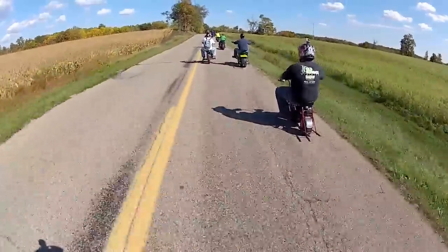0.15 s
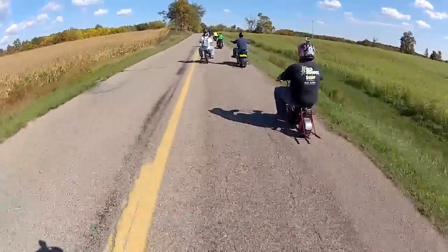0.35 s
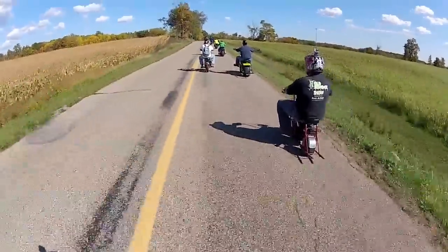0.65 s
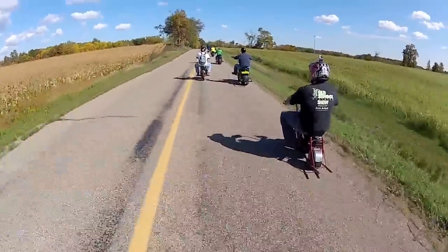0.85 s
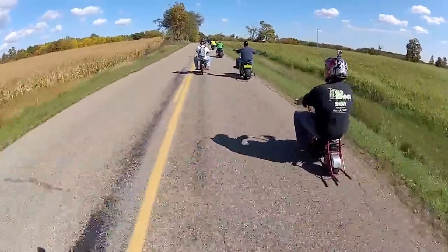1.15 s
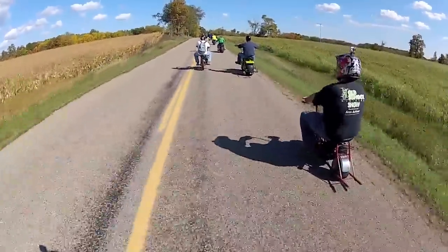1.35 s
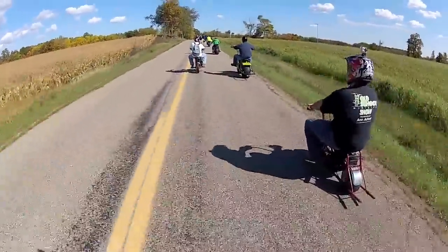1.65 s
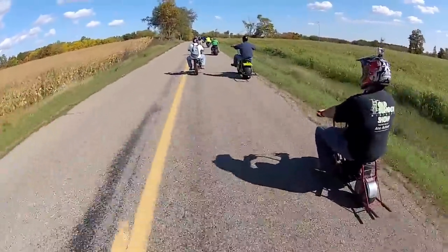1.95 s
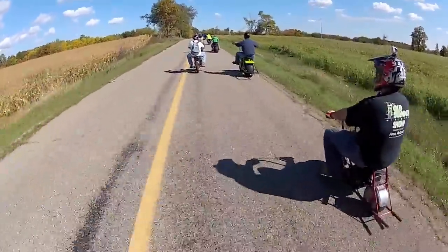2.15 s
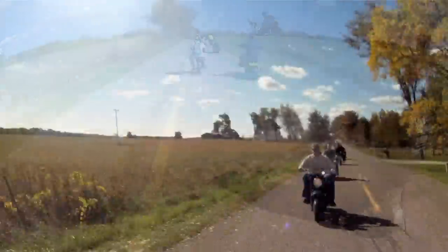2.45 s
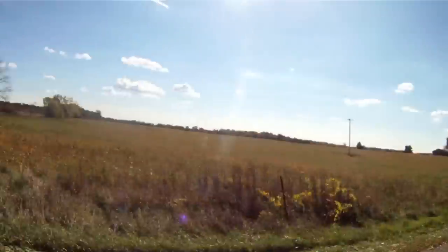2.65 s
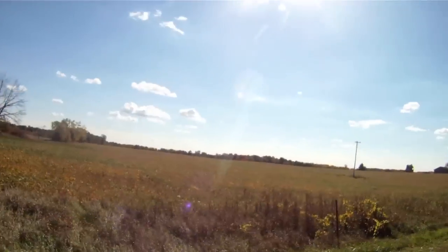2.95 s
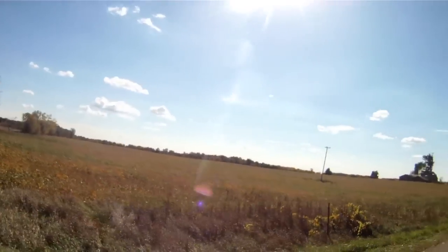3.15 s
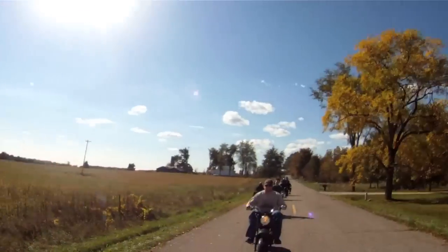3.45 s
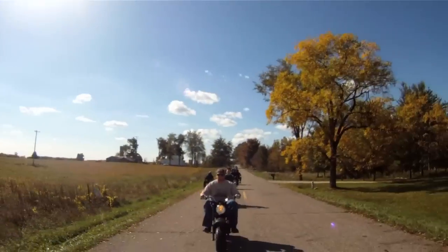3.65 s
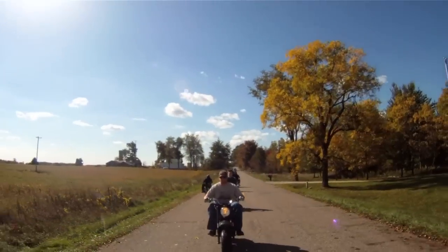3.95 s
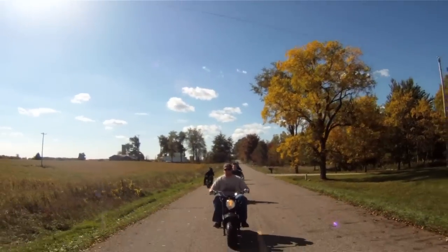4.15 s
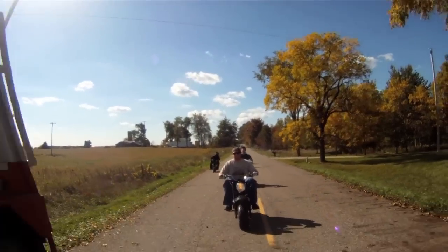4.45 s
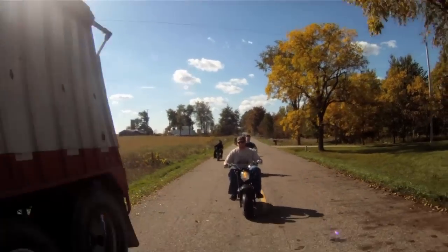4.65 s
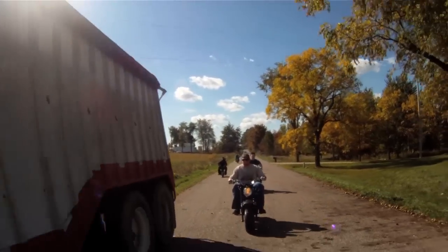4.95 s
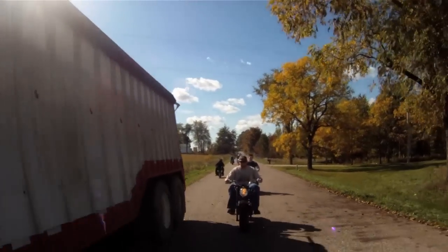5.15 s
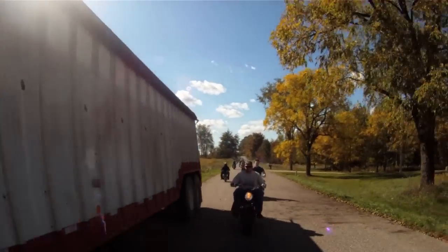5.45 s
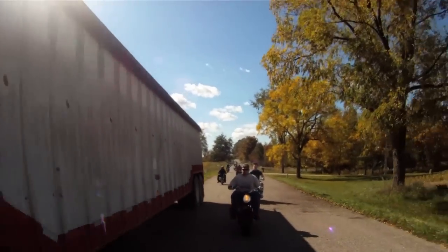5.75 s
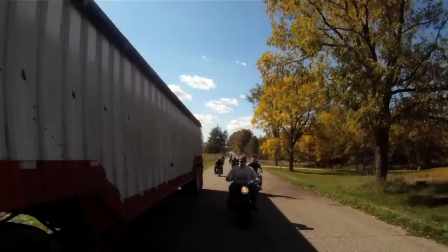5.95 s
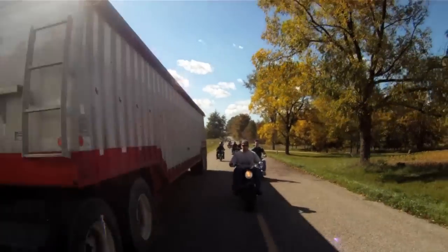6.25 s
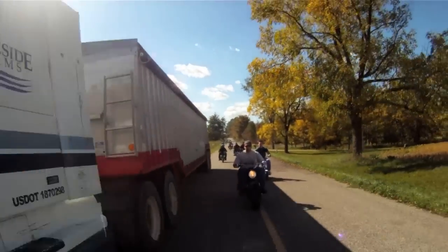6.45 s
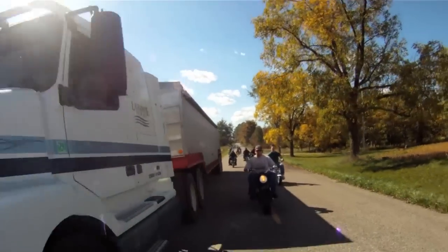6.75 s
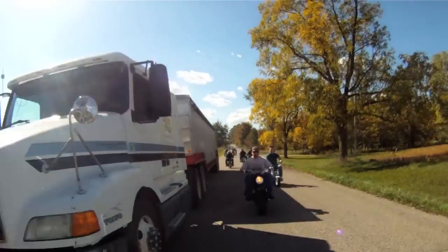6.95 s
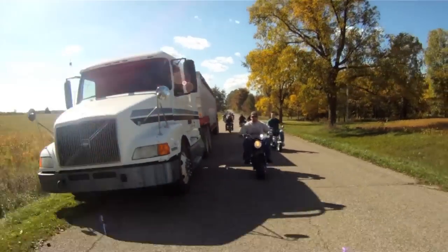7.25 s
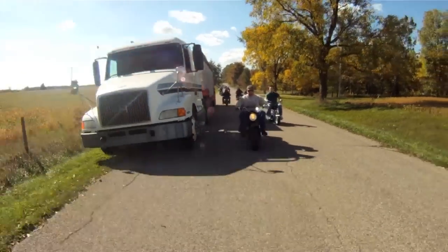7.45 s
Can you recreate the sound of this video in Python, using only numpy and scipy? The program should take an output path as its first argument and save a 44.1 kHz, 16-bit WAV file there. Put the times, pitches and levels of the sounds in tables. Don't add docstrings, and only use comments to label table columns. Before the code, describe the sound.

Riding outdoors on a country road with a microphone in a closed case, two small single-cylinder engines buzz loudly, drifting in and out of step, with sharp cracks and brief overloaded thumps. After about two seconds they crossfade to a quieter group: slower puttering engines, ringing valve ticks, a wavering chain hum and low wind. A third engine joins, thickening the middle beside a parked lorry, then drops away.

```python
import sys
import numpy as np
from scipy import signal
from scipy.io import wavfile
from scipy.ndimage import uniform_filter1d

SR = 44100
rng = np.random.default_rng(int(sys.argv[2]) if len(sys.argv) > 2 else 0)


def volts_from_db(level):
    exponent = np.asarray(level, float) / 20
    return 10 ** exponent


def waveform_to_disk(signal):
    frames = np.transpose(np.atleast_2d(signal))
    scaled = np.clip(frames, -1, 1) * 32767
    samples = np.round(scaled).astype(np.int16)
    wavfile.write(sys.argv[1], SR, samples)


N = 334719

DISSOLVE_S = (2.21, 2.59)
OPEN_ROAD_S = (6.95, 7.15)


def unit(x):
    return x / np.sqrt(np.mean(x ** 2))


def ramp(t0, t1):
    return np.clip((np.arange(N) / SR - t0) / (t1 - t0), 0, 1)


def curve(table):
    s, *columns = np.transpose(table)
    return [np.interp(np.arange(N) / SR, s, column) for column in columns]


def walk(rate_hz):
    k = int(SR / rate_hz)
    held = np.repeat(rng.standard_normal(N // k + 1), k)
    return 0.58 * uniform_filter1d(uniform_filter1d(held, k), k)[:N]


def ring(x, hz, width_hz):
    return signal.lfilter(*signal.iirpeak(hz, hz / width_hz, fs=SR), x)


def ring_twice(x, hz, width_hz):
    return ring(ring(x, hz, width_hz), hz, width_hz)


def body(x, modes):
    out, struck = np.zeros(N), np.flatnonzero(x)
    live = slice(struck[0], struck[-1] + 8192)
    for k, (hz, width_hz, db) in enumerate(modes):
        out[live] += (-1) ** k * volts_from_db(db) * ring_twice(x[live], hz, width_hz)
    return out


def firings(crank):
    s, count = np.transpose(crank)
    when = np.interp(np.arange(count[0], count[-1]), count, s)
    when[1:] = when[0] + np.cumsum(uniform_filter1d(np.diff(when), size=5))
    return when


def engine(crank, throttle, mix, pipe, early_s, jitter_s, echo_s, echo_gain, opening_s,
           scatter_db, puff_early_s, puff_s, shell_db_s=0):
    when = firings(crank)
    chance = rng.standard_normal((len(when), 3))
    at = np.clip(((when - early_s + jitter_s * chance[:, 0]) * SR).astype(int), 0, N - 1)
    span = slice(at[0], at[-1])
    pulses, valve = np.zeros(N), np.zeros(N)
    pulses[at] = -volts_from_db(scatter_db * chance[:, 1])
    pulses = np.convolve(pulses, np.hanning(int(opening_s * SR)))[:N]

    valve[np.clip(at - int(puff_early_s * SR), 0, N - 1)] = volts_from_db(2.5 * chance[:, 2])
    t = np.arange(2048) / SR / puff_s
    gas = signal.fftconvolve(valve, t * np.exp(-t))[:N] * rng.standard_normal(N)

    exhaust = body(pulses + echo_gain * np.roll(pulses, int(echo_s * SR)), pipe[:-1])
    shell = body(pulses, pipe[-1:])
    load, = curve(throttle)
    exhaust_db, gas_db, shell_db = (shut + (wide - shut) * load for shut, wide in mix)
    shell_db = shell_db + shell_db_s * np.arange(N) / SR
    tone = volts_from_db(exhaust_db) * exhaust / exhaust[span].std() + volts_from_db(shell_db) * shell / shell[span].std()
    return np.array([tone, volts_from_db(gas_db) * gas / gas[span].std()])


def cracks(crank, bouts, early_s, top_db, scatter_db, detune, width_hz, shell_db):
    when = firings(crank)
    chance = np.clip(rng.standard_normal((len(when), 2)), -2, 2)
    out, t = np.zeros(N + 1024), np.arange(1024) / SR
    fade = np.exp(-t / 0.0027) * (1 - np.exp(-t / 0.0007))
    for first, length, db, hz in bouts:
        varied = length > 0
        for s, (a, b) in zip(when, chance):
            if not first - .014 < s < first + length + .014:
                continue
            pitch_hz = hz * (1 + varied * detune * b)
            peak_db = db + varied * scatter_db * a
            puff = rng.standard_normal((2, 1024)) * fade
            low = ring(puff[0], pitch_hz, width_hz) + volts_from_db(shell_db) * ring(puff[0], pitch_hz, 60)
            top = ring_twice(puff[1], 4980, 1100)
            burst = low / np.abs(low).max() + volts_from_db(top_db) * top / np.abs(top).max()
            i = int((s - early_s) * SR)
            out[i:i + 1024] += volts_from_db(peak_db - 3) * burst
    return out[:N]


# (time [s], firings so far [count])
OWN_CRANK = [(-0.0283, -1), (0.2738, 8), (0.806, 24), (1.3469, 40), (1.625, 48), (1.9088, 56), (2.1993, 64),
             (2.3474, 68), (2.6633, 76)]
# (time [s], load [0-1])
OWN_LOAD = [
    (0, 0.57),
    (.5, 0.92),
    (1, .5),
    (1.6, 0.22),
    (2.2, 0),
]
# (throttle shut [dB], wide open [dB])
OWN_MIX = [(-12, -7), (-89, -32.5), (-20, -19.5)]
# (pitch [Hz], width [Hz], level [dB])
OWN_PIPE = [(187.4, 181, -2.5), (288, 238, -12.5), (529, 174, -20), (767, 127, -20.5), (1050, 200, -48),
            (257.6, 33.4, 0)]
# (first [s], length [s], peak [dB], pitch [Hz])
OWN_CRACKS = [
    (.173, 0, -15, 1500),
    (.74, 0, -13, 1400),
    (.806, 0, -15, 1500),
    (1.625, 0, -16, 1800),
]


def own_bike():
    sound = engine(OWN_CRANK, OWN_LOAD, OWN_MIX, OWN_PIPE, early_s=.0106, jitter_s=.00012, echo_s=.0056,
                   echo_gain=1.25, opening_s=.0008, scatter_db=2.77, puff_early_s=.0015, puff_s=.00067,
                   shell_db_s=3)
    return sound, cracks(OWN_CRANK, OWN_CRACKS, early_s=.0105, top_db=-25, scatter_db=2, detune=.1,
                         width_hz=1200, shell_db=-8)


# (time [s], firings so far [count])
NEXT_CRANK = [(-0.011, 0), (0.2107, 7), (0.4591, 15), (0.7114, 23), (0.971, 31), (1.2895, 41), (1.8848, 59),
              (2.222, 69), (2.6055, 80)]
# (time [s], load [0-1])
NEXT_LOAD = [
    (0, 0.43),
    (.4, 0),
    (1, 0.28),
    (1.2, 0.78),
    (1.5, .25),
    (1.9, 0.49),
    (2.3, 0.44),
]
# (throttle shut [dB], wide open [dB])
NEXT_MIX = [(-21.5, -10.5), (-48, -20), (-17.5, -27)]
# (pitch [Hz], width [Hz], level [dB])
NEXT_PIPE = [(108, 89, 2), (204, 130, 4), (464, 260, -11), (658, 82, -2.5), (764, 155, -4.5),
             (1065, 140, -33.5), (331, 146, 0)]
# (first [s], length [s], peak [dB], pitch [Hz])
NEXT_CRACKS = [(.21, 0, -11, 2930), (.303, 0, -4, 2500), (.365, 0, -5, 2300), (.459, 0, -10, 2690),
               (.711, 0, -18, 2760), (.97, 0, -6, 2600), (1.034, .066, -16, 3400), (1.13, .1, -8, 2400),
               (1.258, .13, -12.5, 3000), (1.488, .1, -13.5, 2250), (1.651, 0, -11.5, 3100),
               (1.716, 0, -20, 3100), (1.885, .034, -9, 2200), (2.155, 0, -4.5, 2400),
               (2.224, 0, -9.5, 2050), (2.397, 0, -15, 3400)]


def next_bike():
    sound = engine(NEXT_CRANK, NEXT_LOAD, NEXT_MIX, NEXT_PIPE, early_s=.0014, jitter_s=.0002, echo_s=.008,
                   echo_gain=.4, opening_s=.0008, scatter_db=3.5, puff_early_s=.00031, puff_s=.0021,
                   shell_db_s=-6.5)
    return sound, cracks(NEXT_CRANK, NEXT_CRACKS, early_s=.0003, top_db=-11, scatter_db=1.5, detune=.12,
                         width_hz=900, shell_db=0)


# (time [s], firings so far [count])
LEAD_CRANK = [(2.2754, 0), (2.7467, 10), (3.1248, 18), (3.5347, 27), (3.9394, 36), (4.2857, 44),
              (4.6184, 52), (4.9512, 60), (5.2298, 67), (5.5618, 75), (5.8972, 83), (6.2188, 91),
              (6.514, 98), (6.8472, 106), (7.0913, 112), (7.319, 118), (7.6123, 126)]
# (time [s], load [0-1])
LEAD_LOAD = [(2.5, 0.43), (3.3, 0.95), (3.7, 0.66), (4, 1), (4.3, 0.78), (4.55, 1), (4.75, 0.29),
             (5.05, 0.99), (5.3, 0.14), (5.7, .3), (6.05, 1), (6.3, 0.23), (6.5, 0.8), (6.75, 0), (7, 0.79),
             (7.45, 0.63), (7.6, 0)]
# (throttle shut [dB], wide open [dB])
LEAD_MIX = [(-26.5, -20), (-41, -32.5), (-24.5, -38.5)]
# (pitch [Hz], width [Hz], level [dB])
LEAD_PIPE = [(465, 280, 0), (150, 130, -9), (400, 38, 0)]
# (first [s], length [s], peak [dB], pitch [Hz])
LEAD_TICKS = [(3.307, 0, -16, 2880), (3.714, 0, -14.5, 2390), (3.895, .045, -13.5, 2500),
              (4.026, .044, -22, 3200), (4.369, .085, -21, 3100), (4.493, .085, -11.5, 2250),
              (4.618, 0, -14.5, 2980), (6.018, .08, -13, 2350), (6.514, 0, -14, 2400),
              (7.05, .38, -12, 2330), (7.503, .04, -19, 3100)]


def lead_bike():
    sound = engine(LEAD_CRANK, LEAD_LOAD, LEAD_MIX, LEAD_PIPE, early_s=.003, jitter_s=.00008, echo_s=.0023,
                   echo_gain=1.15, opening_s=.0024, scatter_db=1.3, puff_early_s=.004, puff_s=.005)
    open_db = 3 * ramp(*OPEN_ROAD_S)
    return sound * volts_from_db([open_db, -open_db]), cracks(
        LEAD_CRANK, LEAD_TICKS, early_s=.0025, top_db=-30, scatter_db=1.2, detune=.03, width_hz=380, shell_db=9)


# (time [s], firings so far [count])
SLOW_CRANK = [(2.227, 0), (2.7062, 10), (3.0856, 18), (3.595, 28), (4.1473, 39), (4.7623, 51), (5.1151, 58),
              (5.4353, 64), (5.6408, 68), (5.9551, 74), (6.2505, 80), (6.4989, 85), (6.9161, 93),
              (7.2812, 100), (7.6379, 107)]
# (time [s], load [0-1])
SLOW_LOAD = [(2.5, 0.4), (3.4, 0.62), (4.6, 0.87), (5.5, 0.97), (6, 0.29), (6.5, 0.81), (7, 0.82),
             (7.3, 0.22), (7.6, 0.56)]
# (throttle shut [dB], wide open [dB])
SLOW_MIX = [(-23.5, -23), (-67, -37), (-37, -25)]
# (pitch [Hz], width [Hz], level [dB])
SLOW_PIPE = [(120, 102, -5.5), (188, 70, 5.5), (409, 150, -11.5), (544, 93, -11), (268, 45, 0)]
# (first [s], length [s], peak [dB], pitch [Hz])
SLOW_TICKS = [(4.964, 0, -19, 2340), (5.275, 0, -21, 2300), (5.435, 0, -14, 2380), (5.538, 0, -14, 2300),
              (6.35, .05, -21, 2460), (6.499, 0, -22, 2300), (6.707, .053, -19, 2300),
              (6.812, .052, -17, 2370), (6.916, .052, -12.5, 2340), (7.02, .105, -15.5, 2300),
              (7.177, 0, -21, 2300), (7.229, 0, -14, 2330)]


def slow_bike():
    sound = engine(SLOW_CRANK, SLOW_LOAD, SLOW_MIX, SLOW_PIPE, early_s=.009, jitter_s=.0005, echo_s=.0075,
                   echo_gain=.9, opening_s=.002, scatter_db=2.6, puff_early_s=-.006, puff_s=.002)
    return sound * volts_from_db(-6.5 * ramp(*OPEN_ROAD_S)), cracks(
        SLOW_CRANK, SLOW_TICKS, early_s=.0025, top_db=1, scatter_db=1.5, detune=.02, width_hz=600, shell_db=4)


# (time [s], firings so far [count])
FAR_CRANK = [(4.69, 0), (5.674, 25), (5.867, 30), (6.184, 38), (6.48, 46), (7.03, 60)]
# (time [s], load [0-1])
FAR_LOAD = [
    (4.85, 0.77),
    (5.3, 0),
    (5.75, 0.8),
    (6.2, 0.32),
    (6.6, 0.83),
    (6.9, 0.21),
]
# (throttle shut [dB], wide open [dB])
FAR_MIX = [(-45.5, -13), (-40.5, -39), (-39.5, -22)]
# (pitch [Hz], width [Hz], level [dB])
FAR_PIPE = [(220, 290, -1), (328, 57, 9.5), (490, 220, -3.5), (522, 114, 0)]


def far_bike(start_s=4.7, end_s=7.02, fade_s=.051):
    sound = engine(FAR_CRANK, FAR_LOAD, FAR_MIX, FAR_PIPE, early_s=.002, jitter_s=.0004, echo_s=.004,
                   echo_gain=.5, opening_s=.0016, scatter_db=3, puff_early_s=.001, puff_s=.002)
    return sound * (ramp(start_s, start_s + fade_s) - ramp(end_s - fade_s, end_s))


# (pitch [Hz], width [Hz], level [dB])
SILENCER = [(1117, 91, 9.5), (1385, 830, -1.5), (2243, 73, 4), (2360, 40, 11.5), (2940, 1410, 3),
            (3953, 440, -7.5), (4730, 930, -3.5)]


def silencer_hiss(gas):
    return unit(body(gas, SILENCER)) * gas.std()


# (time [s], jolt peak [dB], gain duck [dB])
DUCKS = [
    (.309, 4, -9),
    (.371, 0, -5),
    (.975, 5, -10),
]


def jolts(hz=150, width_hz=300, early_s=.005):
    kick = np.zeros(N)
    for s, peak_db, _ in DUCKS:
        kick[int((s - early_s) * SR)] = volts_from_db(peak_db)
    thump = ring_twice(kick, hz, width_hz)
    return thump * kick.max() / np.abs(thump).max()


# (time [s], pitch [Hz], level [dB])
DRIVE = [(2.45, 391, -24), (2.7, 396, -21), (3.03, 386, -22), (3.2, 400, -23), (3.4, 397, -23),
         (3.6, 398, -19), (3.85, 404, -22), (4.1, 416, -24.5), (4.45, 425, -29)]


def drive():
    hz, level_db = curve(DRIVE)
    phase = 2 * np.pi * np.cumsum(hz) / SR + .3 * walk(20)
    return volts_from_db(level_db + 2.2 * walk(25)) * np.sqrt(2) * np.sin(phase) * (1 - ramp(4.25, 4.45))


def roadside(x, wet_db=-7, decay_s=.014):
    t = np.arange(4096) / SR
    tail = rng.standard_normal(4096) * t / decay_s * np.exp(-t / decay_s)
    return volts_from_db(wet_db) * signal.fftconvolve(x, tail / np.linalg.norm(tail))[:N]


def gust(at_s=6.345, peak_db=-14, hz=55.4):
    t = np.arange(N) / SR - at_s
    return volts_from_db(peak_db) * np.exp(-(t / 0.011) ** 2) * np.sin(2 * np.pi * hz * t)


# (frequency [Hz], level [dB per Hz])
WIND = [(25, -12), (149, 4), (224, -1), (470, -2), (885, -36.5), (1140, -27), (3040, -23.5), (4910, -37)]


def wind():
    out, swell = 0, walk(4.5)
    hz, db = np.transpose(WIND)
    for f in 25 * 2 ** (np.arange(24) / 3):
        noise = ring_twice(rng.standard_normal(N), f, f / 2.43)
        out = out + noise * volts_from_db(np.interp(np.log(f), np.log(hz), db) + 0.5 * swell + 5.4 * walk(18))
    return unit(out) * volts_from_db(-19 - .5 * ramp(*DISSOLVE_S) - 1.5 * ramp(*OPEN_ROAD_S))


def scene():
    after = ramp(*DISSOLVE_S)
    own, own_cracks = own_bike()
    beside, next_cracks = next_bike()
    lead, lead_ticks = lead_bike()
    slow, slow_ticks = slow_bike()
    behind = slow * after + far_bike()
    tone, gas = (own + beside) * (1 - after) + lead * after + behind
    tone = tone + roadside(behind[0])
    hits = own_cracks + next_cracks + lead_ticks + slow_ticks
    return (tone + silencer_hiss(gas) + hits + jolts() + drive() * after + gust() + wind())[None]


def top_cut(x):
    return signal.sosfilt(signal.butter(12, 16670, fs=SR, output="sos"), x)


def record(dry):
    t = np.arange(N) / SR
    duck_db = sum(db * (t > s) * np.exp(-np.clip(t - s, 0, None) / 0.088) for s, _, db in DUCKS)
    x = dry * volts_from_db(uniform_filter1d(duck_db, 90))
    x = signal.sosfilt(signal.butter(6, 5300, fs=SR, output="sos"), x)
    x = signal.resample_poly(x, 40, 147, axis=1)
    x = x / (1 + (np.abs(x) / .95) ** 8) ** (1 / 8)
    x = x * (1 + volts_from_db(-36) * rng.standard_normal(x.shape))
    held = np.repeat(x, 4, axis=1)
    x = signal.resample_poly(held, 147, 160, axis=1)[:, :N]
    x = signal.sosfilt(signal.ellip(8, .2, 60, 15400, fs=SR, output="sos"), x)
    return top_cut(x)


dry = scene()
out = record(dry)
waveform_to_disk(out)
```